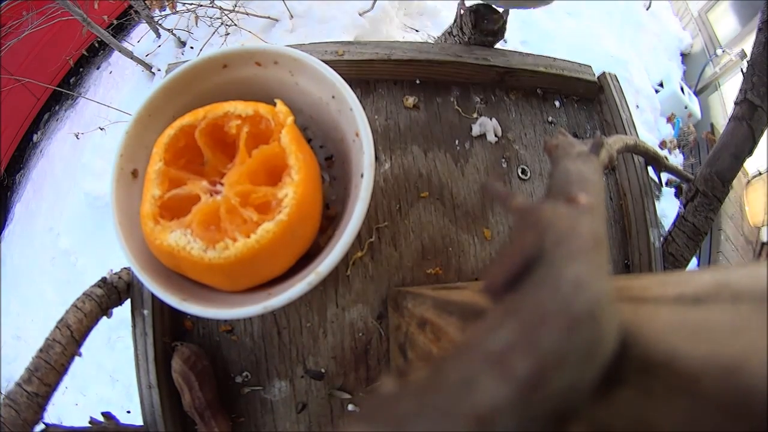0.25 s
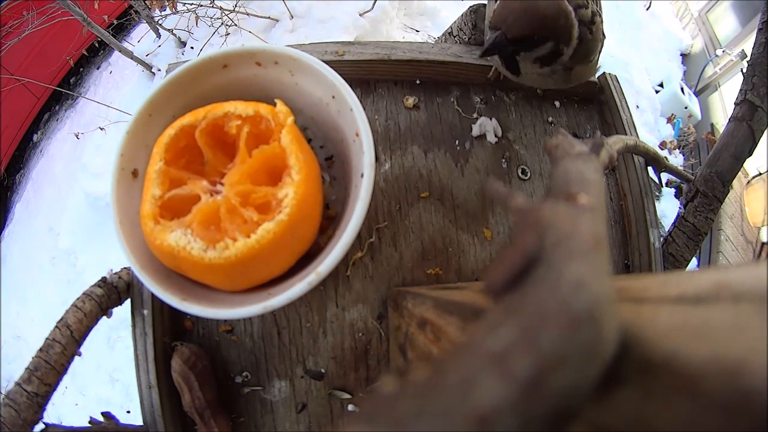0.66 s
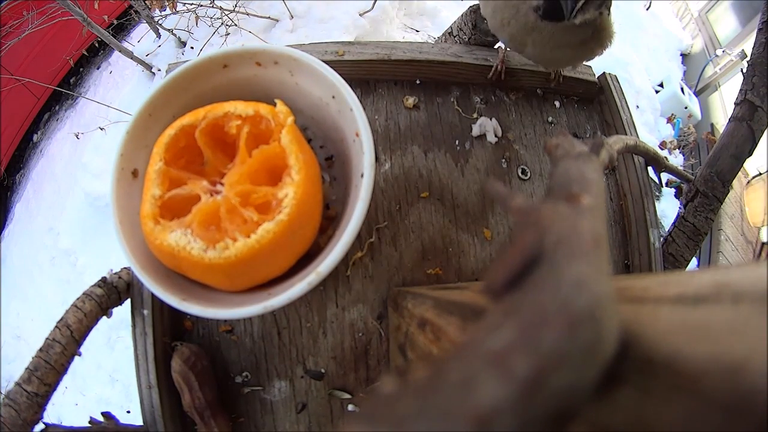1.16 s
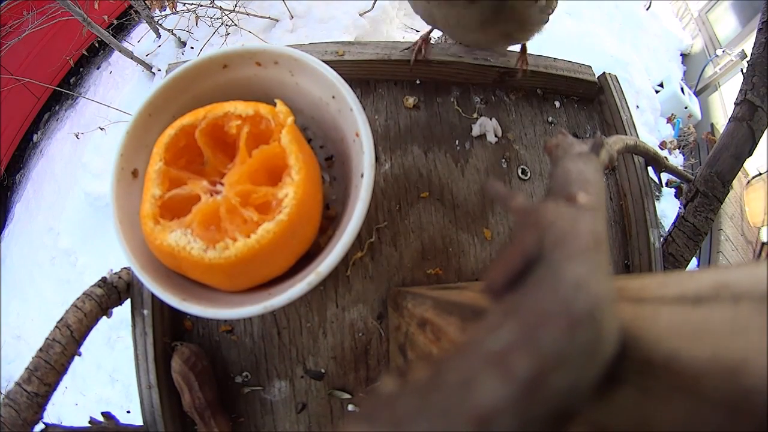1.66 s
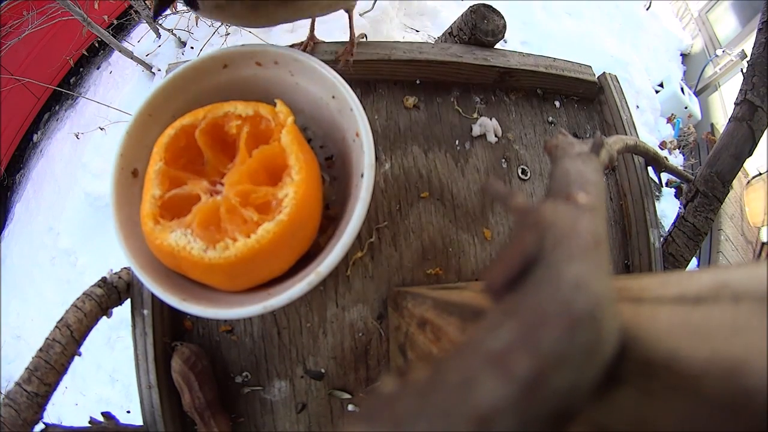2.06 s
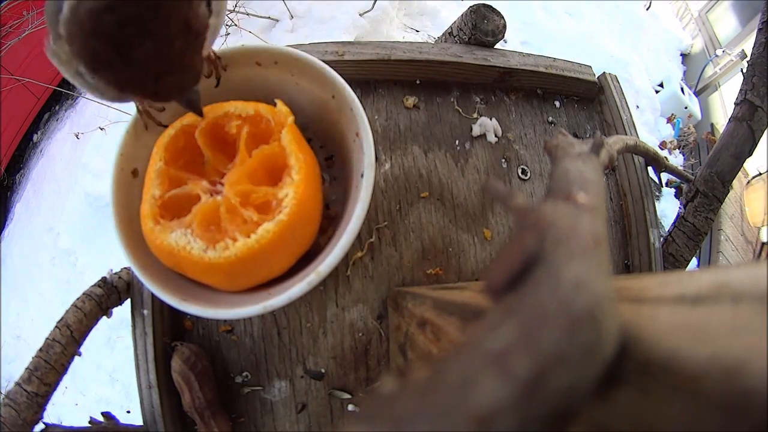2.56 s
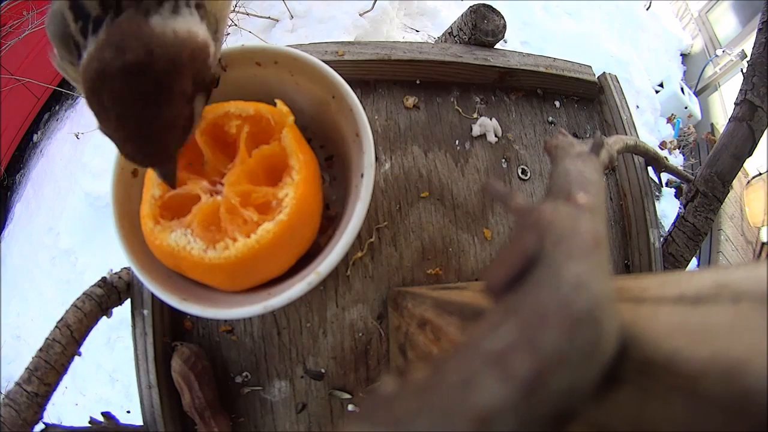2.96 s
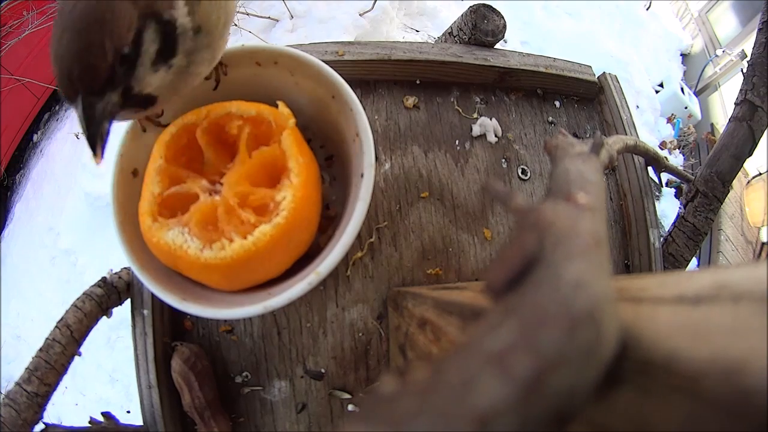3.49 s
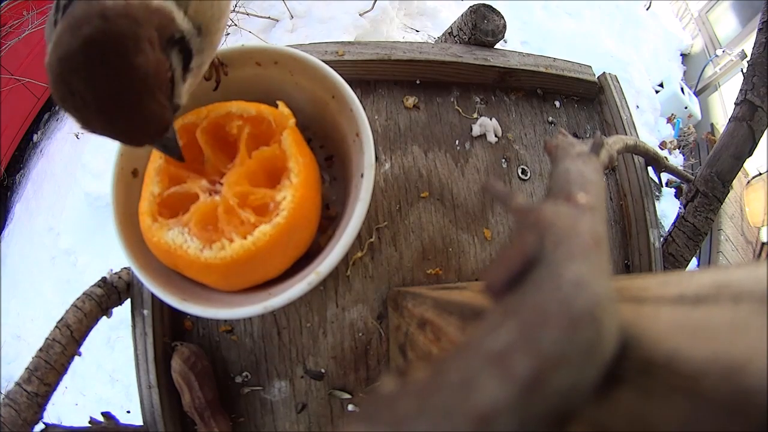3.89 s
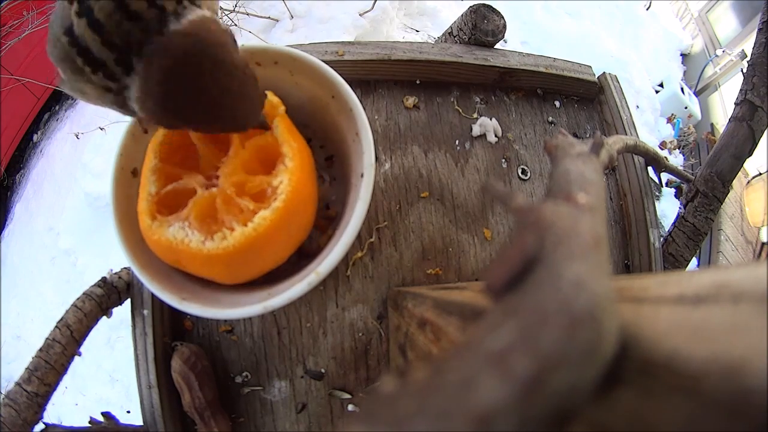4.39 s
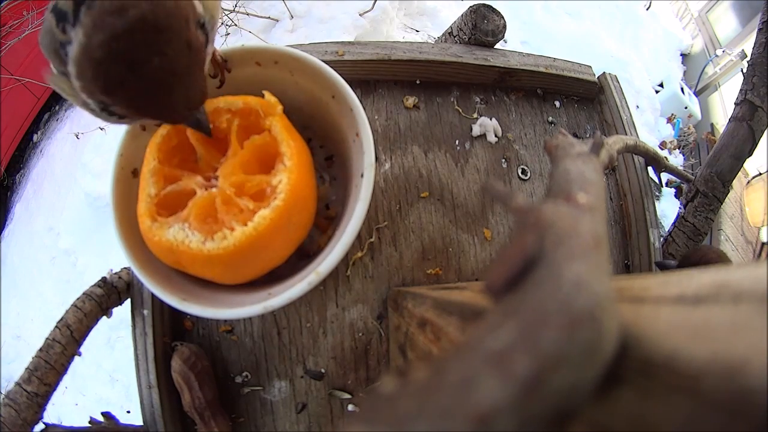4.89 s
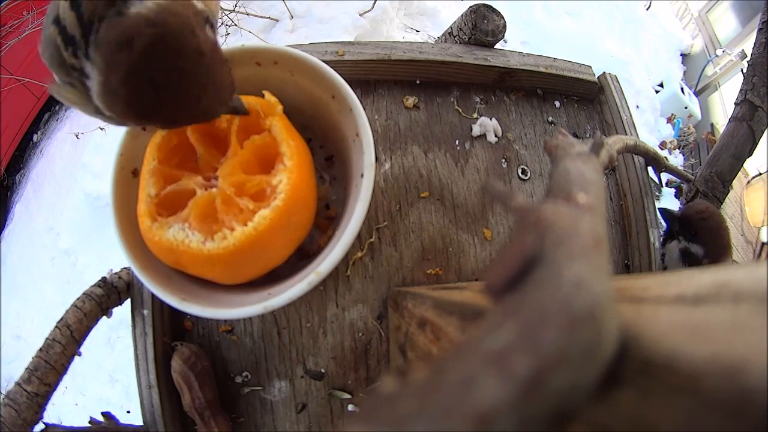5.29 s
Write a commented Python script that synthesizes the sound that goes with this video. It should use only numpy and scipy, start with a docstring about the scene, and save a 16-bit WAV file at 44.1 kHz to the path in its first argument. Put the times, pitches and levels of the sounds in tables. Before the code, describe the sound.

Close, light claw ticks and beak knocks on a wooden tray over a faint hum, ending with one near chirp and a farther call.

```python
"""Sparrows hop, scratch and peck on a wooden feeder tray, close to a stereo microphone.
Claws and beaks tick on the wood, make its rim and floor ring, tear at fruit and tap a china bowl.
Hops and pecks rock the tray, and two wing beats puff air at the microphone.
Near the end one bird chirps close by and another calls farther off. Behind it all lie hiss and hum."""
import sys
import numpy as np
from scipy import signal
from scipy.fft import rfft, irfft
from scipy.io import wavfile
from scipy.ndimage import uniform_filter1d

SR = 44100
rng = np.random.default_rng(int(sys.argv[2]) if len(sys.argv) > 2 else 0)


def file_out(sig):
    """Save sig as 16-bit WAV at sys.argv[1]."""
    # one column per channel
    cols = np.atleast_2d(sig).T
    # limit, then scale
    lim = np.clip(cols, -1, 1)
    pcm = np.round(lim * 32767).astype(np.int16)
    wavfile.write(sys.argv[1], SR, pcm)


N = 244314

# Tone of the background hiss: freq_hz, level_db
AIR_TONE = [(15, -17), (25, -15), (43, -3), (75, -10.5), (118, -5), (165, -12.5), (182, -2), (197, -15),
            (267, -8), (518, -7), (884, -13), (1850, -15), (2270, -16), (8100, -20.5), (11000, -21.5),
            (14300, -105), (22000, -120)]
# How alike the hiss is left and right: freq_hz, likeness (1 same, -1 opposite)
AIR_LIKENESS = [(60, 1), (130, 0.49), (270, 0.17), (570, -0.27), (1220, -0.66), (2590, -0.35), (5500, 0.14),
                (11000, 0.57)]
# How sound reaches the two microphones: freq_hz, left_lead_radians, scattered_share (0 to 1)
MIC_PAIR = [(96, 0.49, 0.3), (256, 1.86, 0.2), (524, 1.73, 0.7), (1280, 1.81, 0.24), (1740, 1.08, 0.04),
            (3450, 1.02, 0.36), (5830, 1.02, 0.22), (10500, 0.78, 0)]
# The far bird's call: time_s, pitch_hz, level_db
FAR_CALL = [(5.291, 1807, -68), (5.33, 2027, -58.5), (5.367, 2128, -53), (5.41, 2092, -53.5),
            (5.435, 2040, -70), (5.471, 2024, -53)]
# Its first four harmonics (multiples of the pitch): level_db
FAR_HARMONICS = [-2.5, 0, -1, -10]
# The near bird's chirp: time_s, pitch_hz, effort_db
CHIRP = [(4.953, 4030, -55), (4.956, 3600, -20), (4.961, 3450, -24.5), (4.963, 2620, -25.5),
         (4.97, 2353, -32.5), (4.980, 2287, -37), (4.990, 2920, -29), (4.999, 2596, -31.5),
         (5.022, 2510, -25), (5.035, 2358, -27), (5.047, 2764, -27), (5.055, 3156, -29.5),
         (5.073, 3130, -32.5), (5.081, 2800, -48)]
# How its throat and beak boost or weaken each frequency: freq_hz, gain_db
THROAT = [(2280, 3.5), (2480, -2.5), (3100, -7), (3550, 4), (4550, 16), (4720, 0.5), (4950, 3), (5300, 0.5),
          (6200, -9), (7200, -21), (7750, -8.5), (8500, -20), (9500, -8), (10800, -21)]
# Wing beats: middle_s, level_db, half_length_s
WING_BEATS = [(3.25, -36.5, 0.047), (3.336, -37.5, 0.0295)]
# The modes (natural ringing notes) of the rim, floor board and bowl: pitch_hz, level_db, ring_s
# A ring time is how long a note takes to fade by 60 dB.
RIM_MODES = [(1102, 10, 0.05), (1220, 17, 0.0067), (1420, -19, 0.03), (1790, -12, 0.012),
             (1850, 13.5, 0.016), (1963, 0.5, 0.052), (2150, -31, 0.1), (2450, -1, 0.024), (2650, 8, 0.042)]
BOARD_MODES = [(322, 8.5, 0.077), (368, 6.5, 0.035), (455, 3, 0.046), (529.3, 1.5, 0.072), (615, -8, 0.069),
               (707, -4, 0.056), (920, 5.5, 0.018)]
BOWL_MODES = [(3490, 6.5, 0.12), (3220, -10, 0.031), (7330, -17, 0.21), (7430, -7, 0.1)]
# How strongly a spot on the rim favours the modes near its own pitch: pitch_hz, focus_db
RIM_FOCUS = [(1450, 0), (1700, -11), (1850, 85)]
# Tone of a hard tick, a dull knock and tearing fruit: freq_hz, level_db
TICK_TONE = [(1500, -23.5), (2300, -6), (2750, -1.5), (3500, 2.5), (4100, -1), (4700, 0), (5800, -3.5),
             (7000, -4), (8000, -7), (9500, -6), (11000, -7.5)]
KNOCK_TONE = [(30, -51), (200, -18), (450, 4), (800, 0), (1150, 0), (1500, 8), (2100, -7.5), (2800, -17),
              (8000, -34)]
RASP_TONE = [(30, -70), (220, -32), (450, -3), (560, 2), (850, -3), (1500, -4), (2200, -6), (3000, -15),
             (9000, -30)]
# A bird shifts its weight: start_s, push_s, rock_db, flex_db
PUSHES = [(.553, 0.014, -61, -63), (2.144, .004, -64, -53.5), (2.357, 0.051, -46.5, -61),
          (3.24, .037, -53, -57), (3.468, 0.011, -47.5, -59), (4.329, 0.037, -44.5, -72),
          (4.396, 0.014, -43, -42), (4.413, 0.047, -42, -57.5), (5.4, 0.02, -56.5, -65)]
# Claws catch the bowl's lip: start_s, level_db
BOWL_TAPS = [(2.329, -50), (2.359, -36), (2.372, -33.5), (4.392, -40)]
# Spells of scratchy ticking, and of a beak tearing fruit: start_s, length_s, level_db
RUSTLES = [(1.582, 0.032, -45), (1.623, 0.033, -40.5), (2.02, 0.073, -49), (2.058, 0.048, -43.5),
           (2.162, 0.064, -46.5), (2.237, 0.091, -50.5), (3.075, 0.042, -45), (3.22, 0.095, -40.5),
           (3.325, 0.035, -35), (3.36, 0.13, -48), (4.316, 0.16, -42.5), (4.77, 0.056, -48)]
RASPS = [(3.035, .115, -47), (3.157, 0.027, -46.5), (4.378, 0.037, -50.5)]
# Claws land on the rim: start_s, tick_db, knock_db, brightness_db, slip_s
STEPS = [(.55, -41, -49, -6, 0.0058), (1.6, -44.5, -47.5, -11, 0.007), (1.636, -41, -37, -7, 0.0052),
         (1.7105, -38.5, -37.5, -3.5, 0.0035), (1.777, -40.5, -34, 23, 0.0044),
         (1.791, -51.5, -62, 3, 0.0045), (1.85, -46, -48, -4.5, 0.0048), (1.934, -45, -49, 1, 0.0089),
         (2.128, -37.5, -26.5, 8, 0.0036), (2.1432, -28, -29.5, -8, 0.0066), (2.1505, -27, -37, 9, 0.0032),
         (2.2045, -41, -46, -7, 0.0039), (2.257, -46, -45.5, 2, .01), (2.292, -56, -43.5, 12, .015),
         (2.306, -45.5, -39.5, -4, 0.014), (2.3274, -42, -65, 8, 0.0034), (2.358, -45, -47, -8, 0.0097),
         (2.372, -41.5, -40.5, -5.5, .008), (2.384, -40.5, -48, -1.5, 0.0076),
         (3.038, -54, -39.5, 3, 0.0057), (3.352, -40.5, -48, -5, 0.0026), (3.443, -40, -55, 3, 0.0015),
         (3.472, -43.5, -53, -5.5, 0.01), (3.636, -51.5, -64, -4, .0015), (4.068, -51, -58, -3, 0.0054),
         (4.141, -44, -44, 1, 0.015), (4.174, -60, -52, -1, 0.0016), (4.315, -39.5, -37.5, 12, 0.014),
         (4.357, -51, -66, -15, 0.0018), (4.391, -45.5, -50, 3, 0.011), (4.418, -46, -47, -8, 0.0028),
         (4.429, -48.5, -45, 7, 0.0035), (4.4384, -49.5, -45.5, 3, 0.0028),
         (4.583, -52.5, -62, 4.5, 0.0023), (5.385, -45.5, -41.5, -1.5, 0.0055),
         (5.476, -43.5, -76, 7, 0.00049), (5.5284, -46.5, -57.5, 3.5, 0.0035)]
# Pecks at seeds and fruit: start_s, tick_db, thud_db, slip_s
PECKS = [(.799, -62, -50, .005), (1.01, -77, -58.5, 0.0097), (1.328, -76, -60, 0.0092),
         (2.854, -47.5, -52, .004), (2.886, -34.5, -34.5, 0.0039), (2.948, -60, -42, 0.0076),
         (3.052, -44, -37, 0.0035), (3.076, -42, -42.5, 0.0059), (3.087, -39.5, -43, 0.015),
         (3.1, -42.5, -42.5, 0.0027), (3.113, -52, -51.5, 0.01), (3.137, -51, -44, 0.011),
         (3.161, -48, -37, 0.0038), (3.168, -37, -49, 0.015), (3.3145, -29.5, -24, 0.0038),
         (3.3232, -23, -32.5, 0.0023), (3.58, -42.5, -38, 0.003), (3.9519, -37.5, -43.5, 0.004),
         (3.964, -56, -48.5, 0.0025), (4.102, -52, -61, 0.0015), (4.046, -43, -43.5, 0.0046),
         (4.204, -40, -44.5, 0.0051), (4.757, -53.5, -50, 0.0053), (4.776, -50.5, -49, 0.0035),
         (4.788, -42, -66, .009), (4.8415, -43.5, -41.5, 0.011), (4.8503, -38.5, -43, 0.0028),
         (4.888, -49.5, -62, 0.0058)]
# Leaning on the bowl deepens the pecks and bends the tray more: time_s, thud_hz, flex_vs_thud_db
PECK_SPOTS = [(.8, 500, -39), (3.13, 580, -18), (3.31, 485.5, -8), (3.95, 404, -10.5), (4.85, 397, -11.5)]


def gain_of(db):
    """Turns decibels into a number to multiply by."""
    return 10 ** (np.asarray(db) / 20)


def evened(x):
    """Scales a sound to an average (rms) level of 1."""
    return x / np.sqrt(np.mean(abs(x) ** 2) + 1e-20)


def look_up(table, hz, column=1):
    """Reads a table at any frequency, sliding between its rows."""
    columns = np.transpose(table)
    return np.interp(np.log(hz + 1), np.log(columns[0] + 1), columns[column])


def add(mix, start_s, sound):
    """Lays a sound into the mix."""
    part = mix[round(start_s * SR):][:len(sound)]
    part += sound[:len(part)]


def wander(hz, size):
    """A smooth random wobble that changes up to about hz times a second."""
    freqs = np.fft.rfftfreq(size, 1 / SR)
    return evened(irfft(rfft(rng.standard_normal(size)) / (1 + (freqs / hz) ** 4), size))


def ring(modes, size=8192):
    """A tapped object rings as fading sine waves and gives off little below its lowest note."""
    t = np.arange(size) / SR
    notes = sum(gain_of(db - 60 * t / ring_s) * np.sin(2 * np.pi * hz * t) for hz, db, ring_s in modes)
    lowest_hz = min(mode[0] for mode in modes)
    return signal.sosfilt(signal.butter(2, 1.466 * lowest_hz, "high", fs=SR, output="sos"), notes)


def click(tone, size=1024):
    """The shortest click that has the given tone."""
    log_gain = np.log(gain_of(look_up(tone, abs(np.fft.fftfreq(size, 1 / SR)))))
    spectrum = np.exp(np.conj(signal.hilbert(log_gain)))
    return np.fft.ifft(spectrum).real[:size // 2]


def catches(size, per_s, spread_db):
    """Tiny random snags on a rough surface, some much stronger than others."""
    strength = gain_of(spread_db * np.minimum(rng.exponential(1, size), 4))
    return evened(strength * rng.standard_normal(size) * (rng.random(size) < per_s / SR))


def tap(bodies, slip_s, first_blow):
    """A blow and a short skid set each (body, level_db) ringing."""
    t = np.arange(3000) / SR
    bite = 1 - np.exp(-t / (0.29 * slip_s))
    skid = bite * np.exp(-t / (0.5 * slip_s)) * np.exp(-(t / 0.04) ** 4)
    force = catches(len(t), per_s=12000, spread_db=3.2) * skid
    force[0] += first_blow
    out = np.zeros(SR // 4)
    for body, db in bodies:
        sound = signal.fftconvolve(force, body)
        # the level counts as if all the energy fell within 10 ms
        add(out, 0, gain_of(db) * sound * np.sqrt(SR / 100 / np.sum(sound ** 2)))
    return out


def mic_pair(sound, scatter, scatter_s, yard_db, yard_ring_s):
    """Two microphones hear a sound out of step, with scatter off the tray and an echo of the yard."""
    t = np.arange(SR // 4) / SR
    hz = np.fft.rfftfreq(len(t), 1 / SR)
    fades = np.array([np.exp(-t / scatter_s), gain_of(-60 * t / yard_ring_s)])
    echoes = rng.standard_normal((2, 2, len(t))) * fades[:, None]
    near, yard = (rfft(echo / np.linalg.norm(echo, axis=1, keepdims=True)) for echo in echoes)
    share = np.clip(scatter * look_up(MIC_PAIR, hz, column=2), 0, 1)
    lead = np.exp(0.5j * look_up(MIC_PAIR, hz) * np.array([[1], [-1]]))
    response = irfft(np.sqrt(1 - share ** 2) * lead + share * near + gain_of(yard_db) * yard, len(t))
    response = np.roll(response, 128, axis=1)  # room for the side that arrives early
    return signal.oaconvolve(sound[None], response, axes=1)[:, 128:N + 128]


def background(air_db=-60.5, hum_hz=202.7, hum_db=-73):
    """Outdoor air and microphone hiss, with a slightly wavering hum."""
    hz = np.fft.rfftfreq(N, 1 / SR)
    mid_noise, side_noise = rfft(rng.standard_normal((2, N))) * gain_of(look_up(AIR_TONE, hz))
    likeness = np.clip(look_up(AIR_LIKENESS, hz), -0.95, 0.95)
    mid = irfft(mid_noise, N)
    side = irfft(side_noise * np.sqrt((1 - likeness) / (1 + likeness)), N)
    air = np.array([mid + side, mid - side]) / np.std(mid) * gain_of(air_db - 0.5 * wander(6.7, N))
    phase = 2 * np.pi * np.cumsum(hum_hz + 1.31 * wander(4.9, N)) / SR
    hum = gain_of(hum_db + 3.1 * wander(1, N)) * np.sqrt(2) * np.sin(phase)
    return air + hum


def far_call(waver_hz=56.4, waver=0.033, hoarseness=0.034):
    """A bird farther off sings one hoarse, fluttering note."""
    times, *columns = np.transpose(FAR_CALL)
    t, out = np.arange(times[0], times[-1], 1 / SR), np.zeros(N)
    hz, db = (np.interp(t, times, column) for column in columns)
    pitch = hz * (1 + waver * np.sin(2 * np.pi * waver_hz * t) + hoarseness * wander(800, SR)[:len(t)])
    phase = 2 * np.pi * np.cumsum(pitch) / SR
    voice = sum(gain_of(level) * np.sin(k * phase) * (1 + wander(540, SR)[:len(t)])
                for k, level in enumerate(FAR_HARMONICS, 1))
    add(out, times[0], gain_of(db) * evened(voice))
    return out


def chirp(rough_at_s=4.989, rough_half_s=0.0061, shimmer_db=2.4):
    """A gliding whistle shaped by the throat; it turns rough as the voice box beats at 1/3 the pitch."""
    times, *columns = np.transpose(CHIRP)
    t, out = np.arange(times[0], times[-1], 1 / SR), np.zeros(N)
    hz, effort_db = (uniform_filter1d(np.interp(t, times, column), size=60) for column in columns)
    roughness = 0.025 + np.exp(-((t - rough_at_s) / rough_half_s) ** 4)
    jitter = (0.012 + 0.046 * roughness) * wander(680, SR)[:len(t)]
    phase = 2 * np.pi * np.cumsum(hz * (1 + jitter)) / SR
    beat = roughness * np.sin(phase / 3)
    phase += 0.87 * beat
    voice = sum(gain_of(effort_db + look_up(THROAT, k * hz)) * np.sin(k * phase) for k in range(1, 5))
    shimmer = gain_of(shimmer_db * wander(170, SR)[:len(t)])
    add(out, times[0], voice * shimmer * (1 + beat))
    return out


def wings(puff_hz=46):
    """Each wing beat blows one slow, gusty puff of air on the microphone."""
    out = np.zeros(N)
    for middle_s, db, half_s in WING_BEATS:
        t = np.arange(-half_s, half_s, 1 / SR)
        puff = 0.67 * np.sin(2 * np.pi * puff_hz * t)
        gust = 0.57 * wander(95, SR)[:len(t)] * np.sin(2 * np.pi * 70 * t)
        add(out, middle_s - half_s, gain_of(db) * (puff + gust) * np.hanning(len(t)) ** 2)
    return out


def peck_pushes(push_s=0.0029, rock_vs_flex_db=-16):
    """Every peck also gives the tray a short push, harder for a louder thud."""
    times, _, flex_db = np.transpose(PECK_SPOTS)
    flexes = [(start_s, thud_db + np.interp(start_s, times, flex_db)) for start_s, _, thud_db, _ in PECKS]
    return [(start_s, push_s, db + rock_vs_flex_db, db) for start_s, db in flexes]


def tray(rock_hz=137, rock_ring_s=0.27, flex_hz=243, flex_ring_s=0.22):
    """The tray rocks and bends on its bracket: unevenly while a bird pushes, then ringing out clean."""
    out, t = np.zeros(N), np.arange(SR // 2) / SR
    for start_s, push_s, rock_db, flex_db in PUSHES + peck_pushes():
        swell = np.sin(np.pi / 2 * np.minimum(t / push_s, 1)) ** 2
        for hz, db, ring_s in ((rock_hz, rock_db, rock_ring_s), (flex_hz, flex_db, flex_ring_s)):
            wobble = wander(54.3, len(t)) + 1j * wander(54.3, len(t))  # in both level and phase
            sway = 1 + 0.49 * np.exp(-t / (push_s + 0.063)) * wobble
            note = (sway * np.exp(2j * np.pi * hz * (start_s + t))).imag
            fade = gain_of(db - 60 * np.maximum(t - push_s, 0) / ring_s)
            add(out, start_s, swell * fade * note)
    return out


def wood_spot(modes, pitch_hz, focus_db, detune):
    """Each spot on the wood favours the modes near its own pitch and varies them a little by chance."""
    chance = rng.uniform(-1, 1, (len(modes), 2))
    varied = [(hz * (1 + detune * shift), db + 3 * boost - focus_db * np.log2(hz / pitch_hz) ** 2, ring_s)
              for (hz, db, ring_s), (shift, boost) in zip(modes, chance)]
    return ring(varied, size=6000)


def board(thud_hz):
    """The floor board, struck at one spot."""
    return wood_spot(BOARD_MODES, thud_hz, focus_db=15, detune=0.008)


def rim(knock_hz):
    """The rim, struck at one spot; one long note and its hard edge ring wherever it is hit."""
    long_note, hard_edge = (1066, -12.5, 0.19), (3450, -2.5, 0.019)  # pitch_hz, level_db, ring_s
    spot = wood_spot(RIM_MODES, knock_hz, focus_db=look_up(RIM_FOCUS, knock_hz), detune=0.016)
    return spot + ring([long_note, hard_edge], size=6000)


def tick(brightness_db, lowest_hz=2350, highest_hz=10120):
    """Claw or beak on wood: a click, a noisy tail and four brief high notes that differ at each spot."""
    t = np.arange(2048) / SR
    grain = gain_of(-30) * rng.standard_normal(len(t)) * np.exp(-t / 0.004)
    pitches = np.exp(rng.uniform(np.log(lowest_hz), np.log(highest_hz), size=4))
    grain += ring([(hz, -23, 0.008) for hz in pitches], size=len(t))
    grain[0] += 1  # the click itself
    tilted = [(hz, db + brightness_db * np.clip(np.log2(hz / 5000), -1, 1)) for hz, db in TICK_TONE]
    return signal.fftconvolve(click(tilted), grain)


def bowl():
    """The china rings briefly, damped by the fruit inside, and its foot thumps the board."""
    out = np.zeros(N)
    for start_s, db in BOWL_TAPS:
        add(out, start_s, gain_of(db) * ring(BOWL_MODES))
        add(out, start_s, tap([(board(thud_hz=394), db - 7)], slip_s=0.0071, first_blow=7.2))
    return out


def rasps():
    """Fibres of the fruit snap in a dense, dull crackle as the beak tears them."""
    out = np.zeros(N)
    for start_s, length_s, db in RASPS:
        size = int(length_s * SR)
        snaps = catches(N // 8, per_s=1300, spread_db=4.5)
        crackle = evened(signal.fftconvolve(snaps, click(RASP_TONE)))
        add(out, start_s, gain_of(db) * crackle[:size] * signal.windows.tukey(size, 0.4))
    return out


def rustles():
    """Short spells of fine, scratchy ticking from claws, beak or feathers lightly ring the wood."""
    force = np.zeros(N)
    for start_s, length_s, db in RUSTLES:
        size = int(length_s * SR)
        snags = catches(N // 8, per_s=1100, spread_db=4)[:size]
        add(force, start_s, gain_of(db) * snags * signal.windows.tukey(size, 0.5))
    bodies = ((ring(RIM_MODES), -9.5), (click(TICK_TONE), -6.5), (ring(BOARD_MODES), -14))
    return sum(gain_of(db) * signal.oaconvolve(force, body / np.linalg.norm(body))[:N]
               for body, db in bodies)


def steps(knock_hz=1900, drop_hz_per_db=8.5, spread_hz=81):
    """A claw ticks and knocks the rim, lower the harder it lands; some of the knock reaches the board."""
    out, usual_db = np.zeros(N), np.median([row[2] for row in STEPS])
    for start_s, tick_db, knock_db, brightness_db, slip_s in STEPS:
        spot_hz = knock_hz - drop_hz_per_db * (knock_db - usual_db) + spread_hz * rng.uniform(-1.04, 1)
        bodies = [(tick(brightness_db), tick_db), (rim(spot_hz), knock_db),
                  (click(KNOCK_TONE), knock_db - 13.5), (board(thud_hz=510), knock_db - 15)]
        add(out, start_s, tap(bodies, slip_s, first_blow=1.8))
    return out


def falling_note(thud_hz, fall_s=0.015, fade_s=0.018):
    """A peck trails off in a short note that falls quickly in pitch."""
    t = np.arange(4000) / SR
    hz = 2.6 * thud_hz / (1 + t / fall_s)
    return np.sin(2 * np.pi * np.cumsum(hz) / SR) * np.sqrt(t) * np.exp(-t / fade_s)


def pecks(hollow_hz=531.7, hollow_ring_s=0.087, dulling=0.17):
    """The beak ticks, duller the harder it hits, and thumps the hollow board; the rim rings along."""
    out, usual_db = np.zeros(N), np.median([row[1] for row in PECKS])
    hollow = ring([(hollow_hz, 0, hollow_ring_s)])
    times, thud_pitches, _ = np.transpose(PECK_SPOTS)
    for start_s, tick_db, thud_db, slip_s in PECKS:
        thud_hz = np.interp(start_s, times, thud_pitches)
        knock_db = (tick_db + thud_db) / 2
        brightness_db = 2.5 - dulling * (tick_db - usual_db)
        bodies = [(tick(brightness_db), tick_db), (rim(knock_hz=1440), knock_db - 3),
                  (click(KNOCK_TONE), knock_db - 12), (board(thud_hz), thud_db - 3.5),
                  (hollow, thud_db - 10), (falling_note(thud_hz), thud_db - 13)]
        add(out, start_s, tap(bodies, slip_s, first_blow=2.4))
    return out


def claws_and_beaks():
    """All that the birds do to the wood and the fruit, a little different on each call."""
    return steps() + pecks() + rustles() + rasps()


def scene():
    """The feeder and two voices reach the microphone pair, along with wing puffs and the background."""
    feeder = claws_and_beaks() + bowl() + tray()
    feeder = mic_pair(feeder, scatter=0.9, scatter_s=0.0008, yard_db=-15, yard_ring_s=0.13)
    # each microphone also faces its own part of the wood, so left and right differ
    feeder += gain_of(-19.5) * claws_and_beaks() * np.array([[1], [-1]])
    near_bird = mic_pair(chirp(), scatter=0.54, scatter_s=0.001, yard_db=-20, yard_ring_s=0.17)
    far_bird = mic_pair(far_call(), scatter=1.8, scatter_s=0.0055, yard_db=-7.5, yard_ring_s=0.23)
    return feeder + gain_of(-4.5) * near_bird + far_bird + wings() + background()


def record(dry, start_s=0.545, roll_off_hz=10950, cutoff_hz=12279):
    """The sound starts after a moment of silence, and its highest treble is cut away."""
    running = np.arange(N) >= start_s * SR
    rolled = signal.sosfilt(signal.cheby1(11, 0.5, roll_off_hz, fs=SR, output="sos"), dry * running)
    low_pass = signal.firwin(255, cutoff_hz, window=("kaiser", 8), fs=SR)
    return signal.oaconvolve(rolled, low_pass[None], "same")


dry = scene()
out = record(dry)
file_out(out)
```